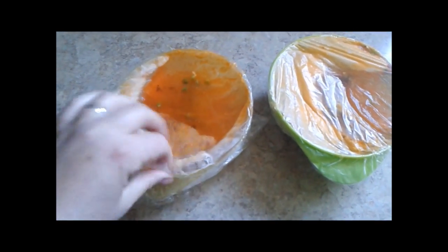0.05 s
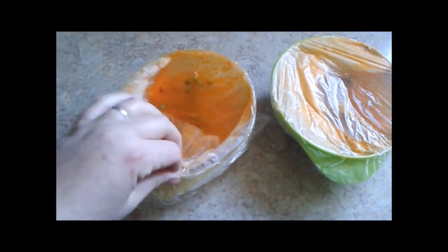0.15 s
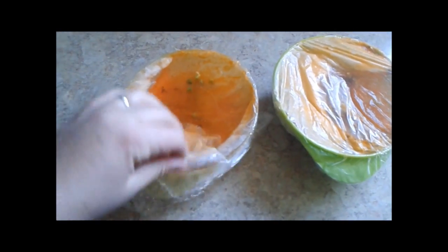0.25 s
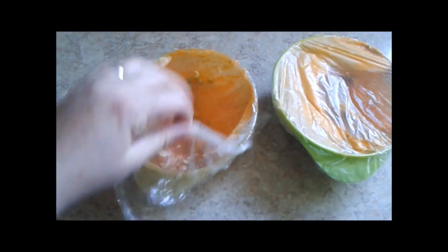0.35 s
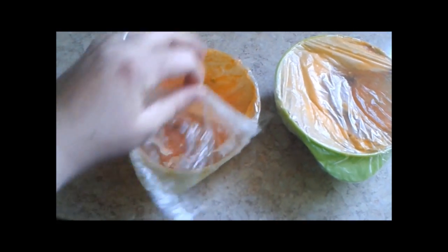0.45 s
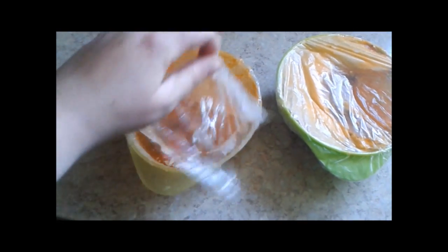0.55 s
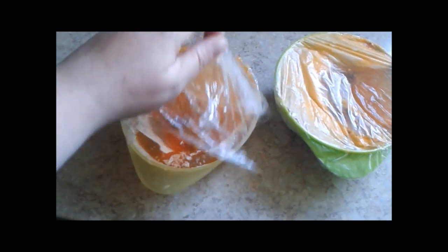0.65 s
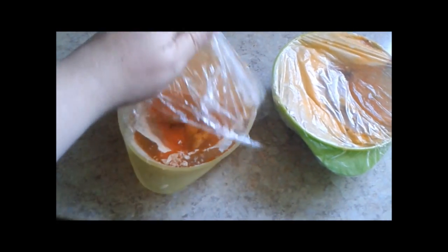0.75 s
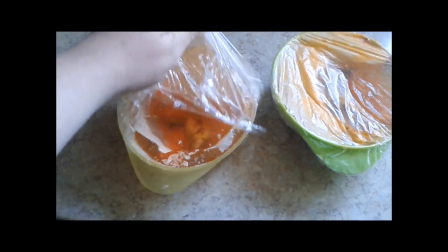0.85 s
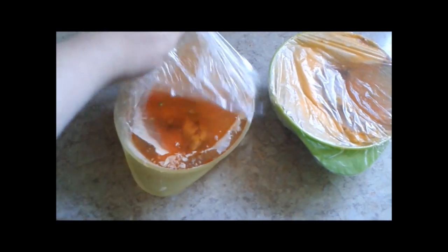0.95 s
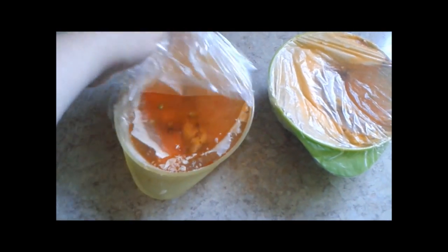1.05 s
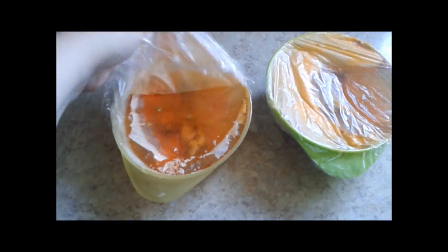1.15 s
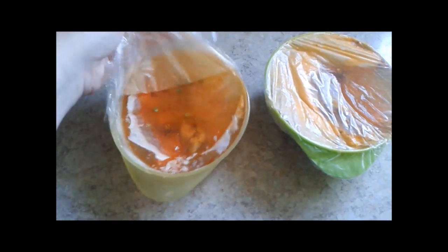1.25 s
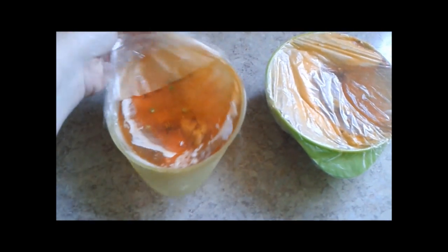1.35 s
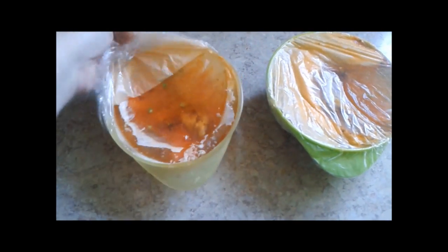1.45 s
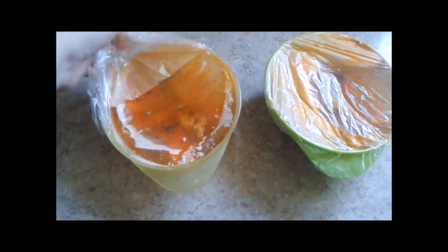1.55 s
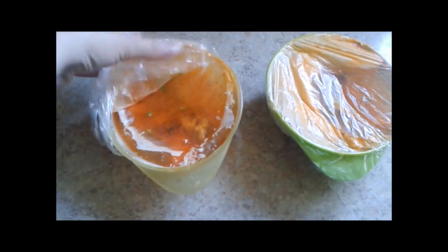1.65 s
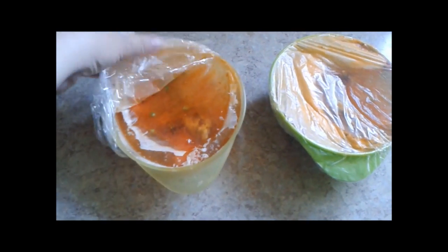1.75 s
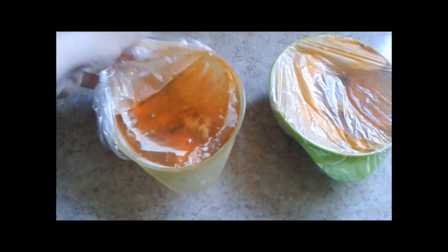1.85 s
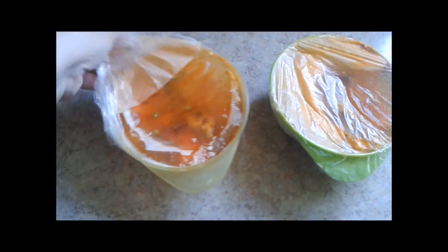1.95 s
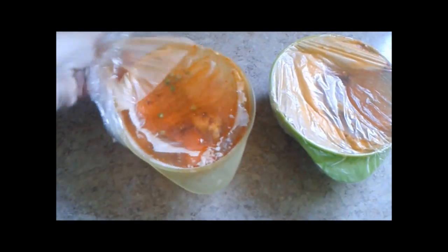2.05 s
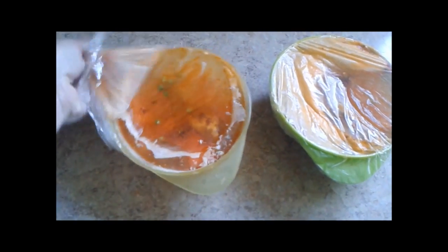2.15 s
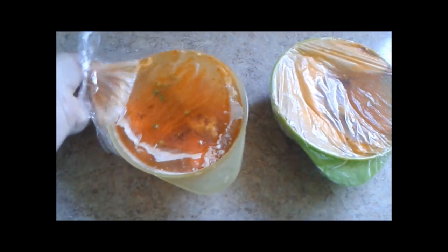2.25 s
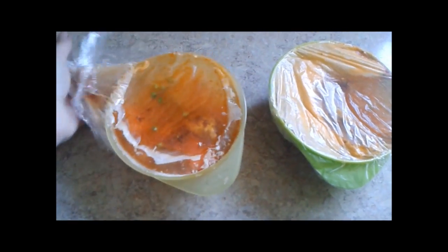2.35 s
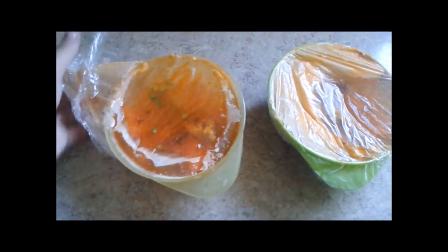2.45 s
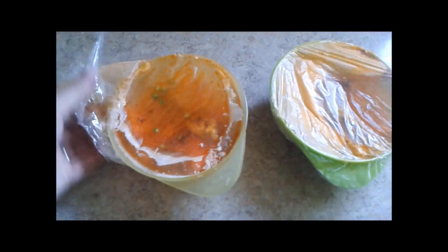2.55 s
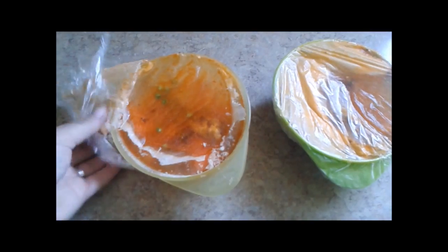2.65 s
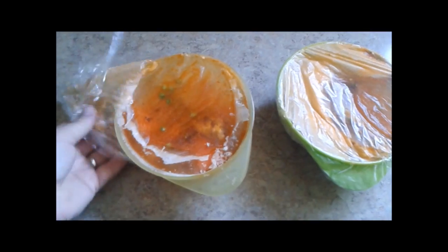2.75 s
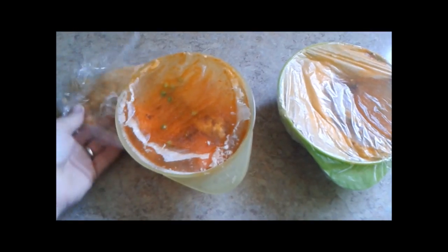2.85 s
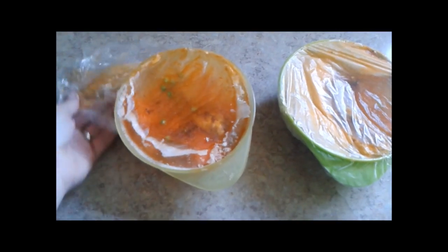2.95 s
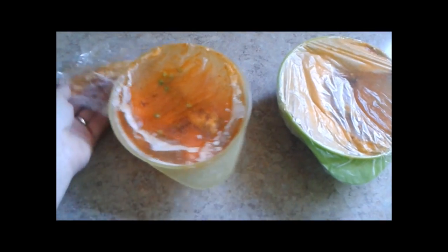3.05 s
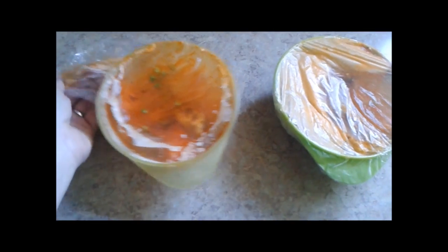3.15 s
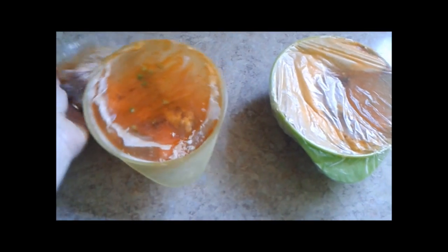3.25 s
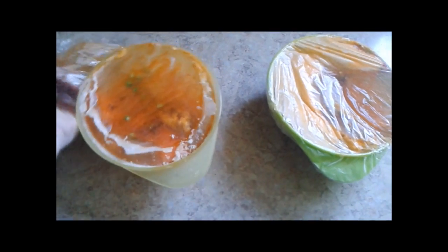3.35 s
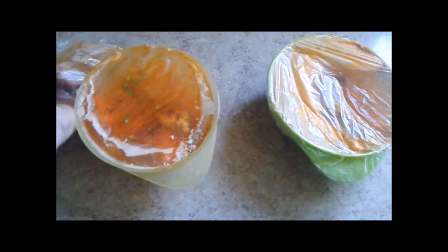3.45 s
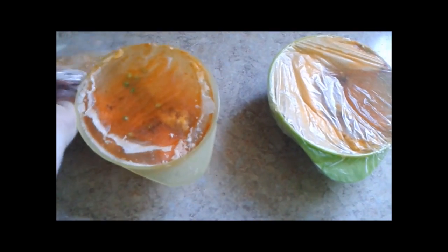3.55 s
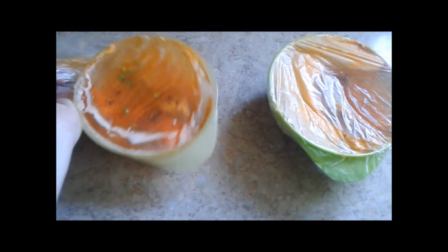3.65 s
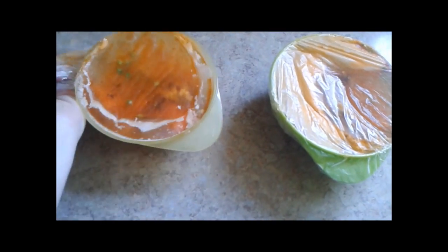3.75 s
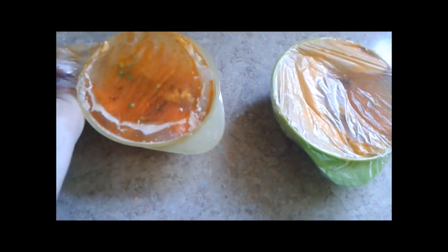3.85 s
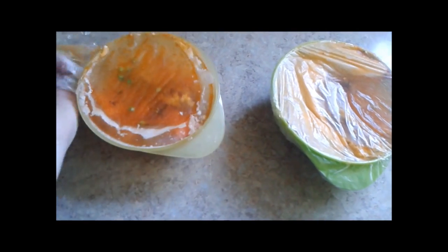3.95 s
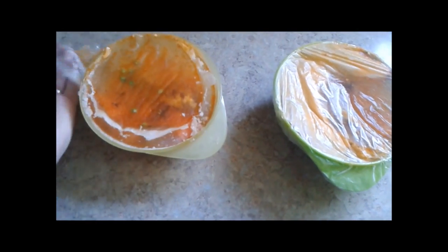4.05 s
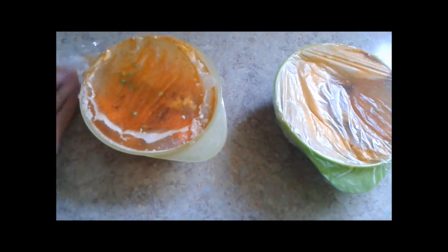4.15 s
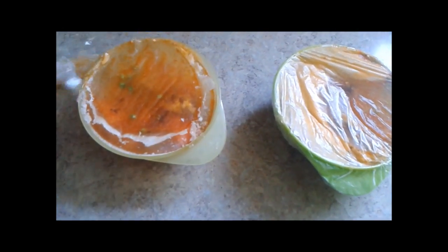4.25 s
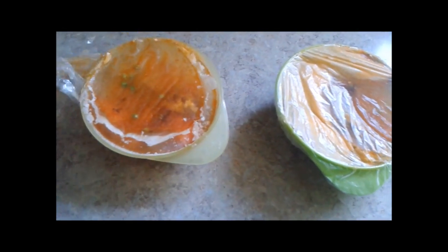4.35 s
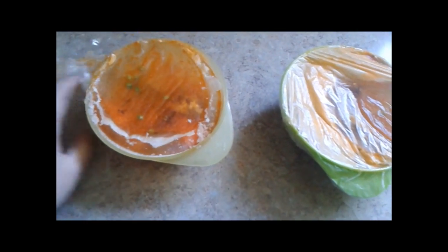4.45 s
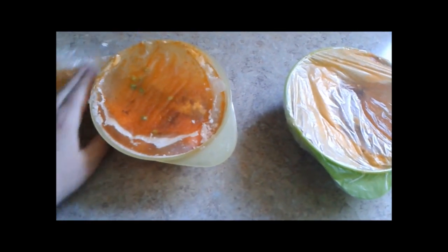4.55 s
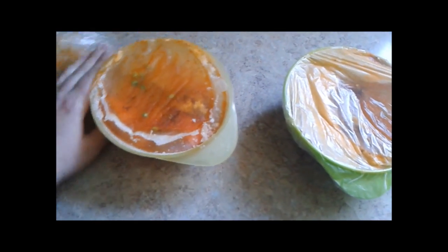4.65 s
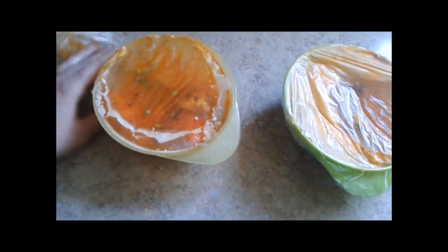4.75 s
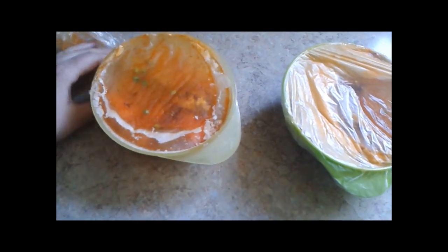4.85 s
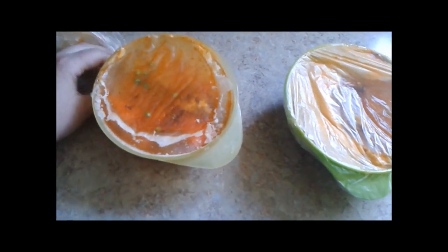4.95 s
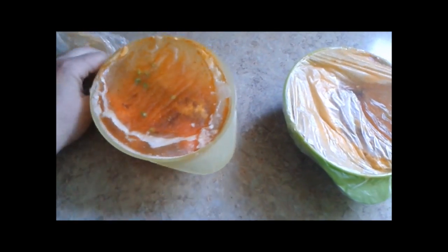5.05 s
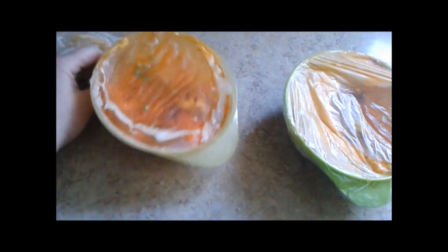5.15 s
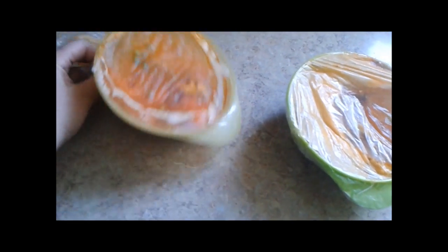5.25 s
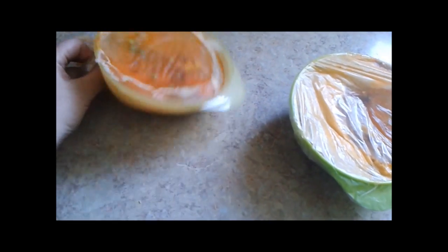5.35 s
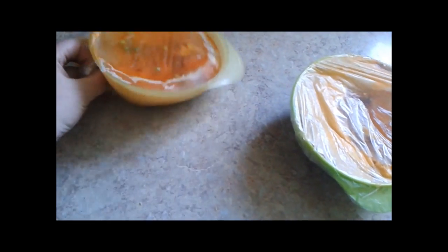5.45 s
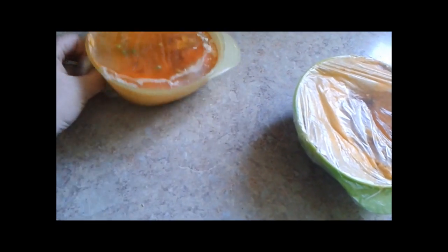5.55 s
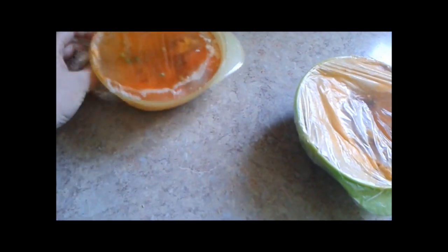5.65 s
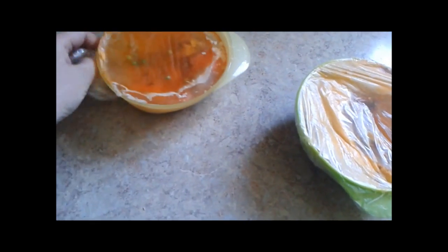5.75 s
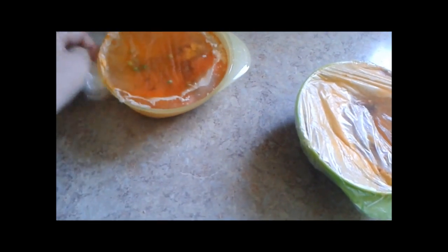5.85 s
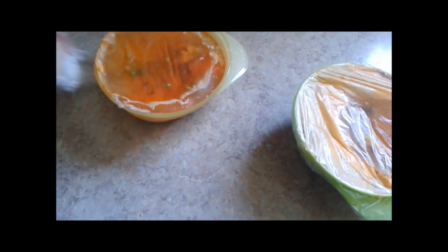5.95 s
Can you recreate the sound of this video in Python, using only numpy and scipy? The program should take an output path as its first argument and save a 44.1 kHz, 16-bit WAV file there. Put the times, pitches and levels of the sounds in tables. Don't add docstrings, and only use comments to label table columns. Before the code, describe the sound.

Thin plastic film crinkles and rustles close up as it is peeled off a tub, ending with a hard knock on a counter.

```python
import sys
import numpy as np
from scipy import signal
from scipy.fft import rfft, irfft, next_fast_len
from scipy.io import wavfile

SR = 44100
rng = np.random.default_rng(int(sys.argv[2]) if len(sys.argv) > 2 else 0)


def volts(x):
    e = np.asarray(x, float) / 20
    return 10 ** e


def persist_wave(psi):
    counts = np.round(np.clip(psi, -1, 1) * 32767).astype(np.int16)
    wavfile.write(sys.argv[1], SR, np.atleast_2d(counts).T)


N = 264584

# [f/Hz, density/dB]
MURMUR_SPECTRUM = [(18, -49), (30, -26.5), (163, -7.5), (200, -7), (252, -6), (286, -4), (323, 1.5),
                   (371, -5.5), (488, -10), (669, -11), (800, -7.5), (1040, -53), (1760, -120)]
# [f/Hz, density/dB]
FILM_SPECTRUM = [(250, -30), (600, -20.5), (1200, -12.5), (2100, -11.5), (2600, -6), (3100, -7.5),
                 (3800, -5), (4700, -1.5), (5500, -3.5), (6500, -10), (7800, -13), (10000, -18),
                 (13000, -21), (16000, -17.5)]
# [t of peak/s,
# level/dB, swell by 10 dB/s, fade by 10 dB/s]
TUGS = [(.02, -37, .02, 0), (.068, -41, 1, 0.04), (0.102, -35.5, .04, -0.05), (.225, -53, 0.6, 3),
        (0.273, -34.5, -0.03, 0.25), (.32, -31.5, 0.01, 0.34), (.462, -33.5, 0.16, 0),
        (0.6, -30, 0.28, 0.01), (.72, -33.5, 0.23, 0.17), (.817, -36, 0.1, .034),
        (.957, -41, -0.03, 0.25), (1.004, -30, .087, 0.22), (1.116, -28.5, .07, 0.1),
        (1.247, -28, .04, 0.04), (1.326, -32.5, 0.19, 0.13), (1.453, -30.5, 0.09, 0.07),
        (1.535, -39, -0.6, 0.4), (1.648, -35, -0.13, .12), (1.764, -34.5, 0, 0.21),
        (1.87, -33, -0.02, 0.15), (1.98, -27.5, 0.02, 0.17), (2.103, -32.5, .02, 0.14),
        (2.19, -29.5, .022, 0.1), (2.348, -33.5, 0.1, 0.08), (2.394, -40.5, 0.1, 0.13),
        (2.572, -36.5, 0.024, 0.047), (2.7, -35.5, 0.048, 0.062), (2.823, -31.5, 0.063, 0.123),
              (2.91, -36.5, 0.096, 0.42), (3.06, -30.5, 0.038, 0.064), (3.21, -31.5, 0.02, 0.03),
              (3.341, -33, 0.14, 0.15), (3.423, -37, 0.24, 0.072), (3.594, -30.5, 0.058, 0.027),
              (3.668, -42.5, 0.194, 0.3), (3.821, -41, 0.043, 0.067), (4.016, -38.5, 0.082, 0.09),
              (4.159, -37.5, 0.261, 0.14), (4.222, -44, 0.033, 0.088), (4.439, -45, 0.017, 0.047),
              (4.518, -42, 0.053, 0.42), (4.639, -40.5, 0.12, 0.07), (4.84, -36, 0.23, 0.55),
              (5.002, -30, 0.086, 0.036), (5.093, -32, 0.064, 0.078), (5.295, -36, 0.41, 0.04),
              (5.54, -35, 0.427, 0.17), (5.692, -26, 0.059, 0.14), (5.85, -34.5, 0.3, 0.067),
              (5.965, -42.5, 0.027, 0.46)]
# [t/s, slack level/dB, slide level/dB]
SHEET = [(0, -2, 0.5), (.2, -5, 2), (.4, 0, 4.5), (.75, 0, 0.5), (1.1, -0.5, 2), (1.5, -2.5, -2),
         (2.2, -0.5, 1.5), (2.4, 2.5, 2), (3.1, 3.5, 1.5), (3.9, 1, 0), (4.5, 2.5, -0.5), (5.0, -2, -2),
         (5.3, 2.5, -1), (5.6, 1.5, -1), (6.0, -2, 2)]
# [t/s, f/Hz]
POCKET = [(0, 4400), (.3, 3360), (.6, 3270), (.9, 3960), (1.35, 3930), (1.6, 3100), (1.85, 3100),
          (2.0, 4330), (2.4, 4580), (3.5, 4840), (3.9, 4460), (4.5, 4800), (6.0, 4780)]
# [t/s, peak level/dB, crease size/dB]
SNAPS = [(0.0108, -17, 3), (0.063, -20, 0), (0.0888, -24.5, 4), (.162, -22.5, -19), (0.2726, -11.5, 2.5),
         (0.3202, -14.5, 9.5), (0.709, -13, 3), (.81, -9.5, -1), (.9113, -31, -9), (0.9448, -11, -4),
         (.9617, -10, -16), (1.2883, -4.5, -6), (1.655, -14, -7), (1.683, -21, 7.5), (1.7494, -18, 6),
         (1.8664, -16, 2), (1.903, -16, 7.5), (2.115, -6, -13), (2.183, -10.5, 2), (2.191, -9, -11),
         (2.5652, -13, -9), (2.6678, -18.5, 4), (2.812, -12, 4), (3.2, -30, 7), (3.5648, -14, 4),
         (3.5826, -14.5, 0), (4.004, -16.5, -1), (4.4278, -25, -7), (4.7046, -16, -16), (4.7997, -17, 4)]
# [t/s, peak level/dB, crease size/dB, papery
# surplus/dB]
RIM_SNAPS = [(5.0978, -12.5, 1, 12), (5.12, -17, 4, -2), (5.1476, -10.5, -3, 8.5), (5.1674, -28, 4, 7),
             (5.1938, -6.5, -8.5, 6.5), (5.248, -13, -6, 0), (5.248, -8.5, 5, -15), (5.2821, -8.5, 14, -6),
             (5.299, -10, -17, 8), (5.3323, -8, 7, -6), (5.3416, -29, 20, -8), (5.4075, -0.5, -2.5, -19),
             (5.4171, -10, 4, 0), (5.457, -10.5, -6, 2), (5.5004, -18, 12, 2), (5.5477, -8.5, -9, 2),
             (5.591, -21, 11, -23), (5.6463, -2.5, 1, -2), (5.6842, -10, 1, -8), (5.7283, -6.5, 19, -7),
             (5.8252, -14, 4, -16)]
# [t/s, counter ring level/dB, dull thud level/dB, thud t60/s]
BUMPS = [(0.194, -37, -37.5, 0.11), (0.937, -68, -45.5, 0.16), (1.52, -53, -56, 0.19),
         (1.949, -55, -44.5, 0.11), (2.065, -36.5, -39.5, 0.24), (2.108, -59, -45, 0.17),
         (2.189, -59, -33, 0.068), (2.295, -39.5, -49, 0.12), (3.247, -42, -52, 0.17),
         (3.364, -47, -44, 0.13), (4.311, -51, -52, 0.25), (4.504, -46.5, -58, 0.18),
         (4.646, -41, -35, 0.12), (5.105, -48, -39, 0.14), (5.646, -39, -38, 0.075),
         (5.728, -13, -39.5, 0.058), (5.743, -20.5, -20, 0.09), (5.77, -50, -42, 0.59)]
# [f/Hz, level/dB, t60/s]
COUNTER_MODES = [(131.8, -2, 0.23), (199, -1.5, 0.16), (255, -2, 0.15), (333.3, -9, 0.2), (425, -5.5, 0.34),
                 (476, -6, 0.1), (675, -14, 0.13), (840, 8.5, 0.047)]
SET_DOWN_S = [
    5.6453,
    5.7252,
    5.7268,
    5.7276,
]
SET_DOWN_DB = [
    -17,
    -22,
    -17,
    -4,
]
# [f/Hz, level/dB, t60/s]
TUB_MODES = [(1400, -20, 0.042), (1843, -4.5, 0.02), (3470, -8, 0.016), (4280, 10, 0.0048),
             (4960, 7, 0.0051), (5140, -26, 0.0087), (8700, -9.5, 0.0096)]

TUB_AIR_HZ = (1182, 2100)


def rms_one(x):
    return x / np.sqrt(np.mean(x ** 2) + 1e-20)


def butter(x, order, hz, kind):
    return signal.sosfilt(signal.butter(order, hz, kind, fs=SR, output="sos"), x)


def in_time(rows):
    s, *columns = np.transpose(rows)
    return [np.interp(np.arange(N) / SR, s, column) for column in columns]


def colour(x, points):
    size = next_fast_len(N + 4096)
    hz, db = np.transpose(points)
    bins_hz = np.fft.rfftfreq(4096, 1 / SR) + 1
    log_gain = np.log(volts(np.interp(np.log(bins_hz), np.log(hz), db)))
    cepstrum = irfft(log_gain)
    cepstrum[1:2048] *= 2
    cepstrum[2049:] = 0
    impulse = irfft(np.exp(rfft(cepstrum)))
    return irfft(rfft(x, size) * rfft(impulse, size), size)[..., :N]


def film_noise():
    return colour(rng.standard_normal(N), FILM_SPECTRUM)


def drift(rate_hz):
    r = np.exp(-80 * np.pi * rate_hz / SR)
    slow = signal.lfilter([1], [1, -2 * r, r * r], rng.standard_normal(N // 40 + 2002))[2000:]
    return np.interp(np.arange(N) / 40, np.arange(len(slow)), rms_one(slow))


def ring(clicks, hz, t60):
    r = volts(-60 / (t60 * SR))
    w = 2 * np.pi * hz / SR
    return signal.lfilter([0, np.sin(w)], [1, -2 * r * np.cos(w), r * r], clicks + 1e-18)


def clicks_at(s, gains):
    out = np.zeros(N)
    out[np.round(np.array(s) * SR).astype(int)] = gains
    return out


def bursts(rows, rise_s):
    out = np.zeros(N + 8000)
    age = np.arange(8000) / SR
    for (s, gain, t60), noise in zip(rows, rng.standard_normal((len(rows), 8000))):
        shape = volts(-60 * age / max(t60, .003)) * (1 - np.exp(-age / rise_s))
        at = round(s * SR)
        out[at:at + 8000] += gain * noise * shape * np.linalg.norm(shape) / np.linalg.norm(noise * shape)
    return out[:N]


def parts(x):
    cuts = [([350, 2100], "band"), ([2100, 3600], "band"), ([3600, 7000], "band"), (7000, "high")]
    return [butter(x, 3, hz, kind) for hz, kind in cuts]


def murmur():
    low = rms_one(colour(rng.standard_normal(N), MURMUR_SPECTRUM))
    return volts(-58 + 1.5 * drift(9)) * low + volts(-67) * rms_one(film_noise())


def effort():
    flank_bend = 1.5
    t = np.arange(0, N + 64, 64) / SR
    power = 1e-8
    for s, db, swell_s, fade_s in TUGS:
        away = np.where(t < s, (s - t) / max(swell_s, .01), (t - s) / max(fade_s, .01))
        power = power + volts(2 * (db - 10 * away ** flank_bend))
    return np.interp(np.arange(N) / SR, t, 10 * np.log10(power))


def handling():
    level_db = effort()
    slack_db, slide_db = in_time(SHEET)
    extra = level_db - -35
    dull_db = -12 - 0.13 * extra + slack_db
    papery_db = -3.5 - 0.12 * extra + 0.41 * slack_db
    airy_db = -11.5 - 0.072 * extra + slide_db
    return level_db, dull_db, papery_db, airy_db


def rustle(per_s, spread_db, clump_db, patch_db, cycles, drag_db):
    level_db, dull_db, papery_db, airy_db = handling()
    sizes = volts(spread_db * np.minimum(rng.exponential(1, N), 3.5)) * rng.choice([-1, 1], N)
    rate = per_s * volts(clump_db * (drift(14) + 1.2 * drift(90)))
    buckles = sizes * (rng.random(N) < rate / SR)
    dealt = rng.integers(0, 24, N)
    creases = 0
    for k, hz in enumerate(np.geomspace(450, 17500, 24)):
        clicks = buckles * (dealt == k) * volts(patch_db * drift(29))
        creases = creases + np.sqrt(hz) * rms_one(ring(clicks, hz, cycles / hz))
    dull, papery, crisp, airy = map(rms_one, parts(colour(creases, FILM_SPECTRUM)))
    drag = parts(film_noise())[-1]
    airy = rms_one(airy + volts(drag_db) * rms_one(drag))
    mix = crisp + volts(dull_db) * dull + volts(papery_db) * papery + volts(airy_db) * airy
    return volts(level_db) * mix


def hollows(sheet):
    pocket_hz = in_time(POCKET)[0]
    slack_db, _ = in_time(SHEET)
    level_db = effort()
    pocket = 0
    for centre in np.geomspace(2800, 5600, 9):
        edges = centre * 2 ** (np.array([-.5, .5]) * 0.23)
        nearness = np.clip(1 - 8 * np.abs(np.log2(pocket_hz / centre)), 0, 1)
        pocket = pocket + butter(sheet, 2, edges, "band") * nearness
    tub_air = rms_one(butter(sheet / volts(level_db), 3, TUB_AIR_HZ, "band"))
    tub_db = level_db - 27 + 1.3 * slack_db
    return volts(-7.5) * pocket + volts(tub_db) * tub_air


def snaps(crisp_db, other_db):
    rows = [(*row, 0) for row in SNAPS] + RIM_SNAPS
    s, peak_db, size_db, surplus_db = np.transpose(rows)
    t60 = np.full(len(s), .014)
    levels_db = [peak_db - 24 + size_db + other_db,
                 peak_db - 20 + size_db / 2 + surplus_db + other_db,
                 peak_db + crisp_db,
                 peak_db - 29 + other_db]
    units = [np.std(part) for part in parts(film_noise())]
    out = 0
    for k, db in enumerate(levels_db):
        burst = bursts(np.transpose([s, volts(db), t60]), rise_s=.0003)
        out = out + parts(colour(burst, FILM_SPECTRUM))[k] / units[k]
        if k == 0:
            out = out / 2
            out = out + volts(-0.5) * butter(2 * out, 2, TUB_AIR_HZ, "band")
            out = out - volts(-0.5) * 0.5 * butter(2 * (out * 0), 2, TUB_AIR_HZ, "band")
    return out


def bumps():
    contact_hz = 600
    s, ring_db, thud_db, thud_t60 = np.transpose(BUMPS)
    thuds = bursts(np.transpose([s, volts(thud_db + 15.0), thud_t60]), rise_s=0.0078)
    out = butter(thuds, 2, [130, 750], "band")
    chance_db = rng.normal(0, 2, (len(BUMPS), len(COUNTER_MODES)))
    for k, (hz, level_db, t60) in enumerate(COUNTER_MODES):
        push = volts(ring_db + level_db + chance_db[:, k] - 9.5)
        softened = push / np.hypot(1, (hz / contact_hz) ** 2)
        out += (-1) ** k * ring(clicks_at(s, softened), hz, t60)
    return butter(out, 2, 95, "high")


def taps():
    strengths = volts(SET_DOWN_DB)
    clicks = clicks_at(SET_DOWN_S, strengths)
    rings = 0
    for k, (hz, db, t60) in enumerate(TUB_MODES):
        rings = rings + (-1) ** k * volts(db) * ring(clicks, hz, t60)
    crack = parts(clicks)[-1]
    rattle = bursts([(s, gain, .05) for s, gain in zip(SET_DOWN_S, strengths)], rise_s=0.0017)
    return rings + volts(-25) * crack + volts(-11) * colour(rattle, FILM_SPECTRUM)


def kitchen(x):
    t60_s, wall_cut_hz = .35, 6300
    size = next_fast_len(N + SR)
    age = np.arange(SR // 2) / SR
    tail = rng.standard_normal(SR // 2) * volts(-60 * age / t60_s) * (age > .004)
    tail = signal.lfilter([1], [1, -np.exp(-2 * np.pi * wall_cut_hz / SR)], tail)
    tail = tail / np.linalg.norm(tail)
    return irfft(rfft(x, size) * rfft(tail, size), size)[:N]


def scene():
    film = rustle(per_s=13000, spread_db=1.0, clump_db=2.0, patch_db=0.6, cycles=4.4, drag_db=0.5)
    near = film + hollows(film) + snaps(crisp_db=-12.5, other_db=4.0) + bumps() + taps()
    return (near + volts(-13) * kitchen(near) + murmur())[None]


def band_limit(x):
    return signal.sosfilt(signal.butter(12, 16660, fs=SR, output="sos"), x)


def record(dry):
    thin = butter(dry, 2, 34, "high")
    rounded = np.tanh(thin / .95) * .9
    top_cut = signal.ellip(14, .3, 95, 15780, fs=SR, output="sos")
    return band_limit(signal.sosfilt(top_cut, rounded))


dry = scene()
out = record(dry)
persist_wave(out)
```